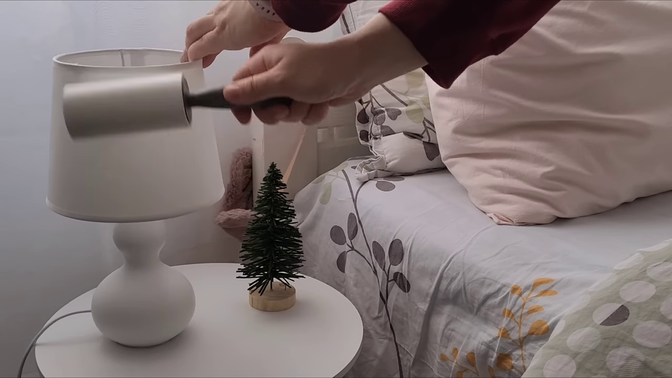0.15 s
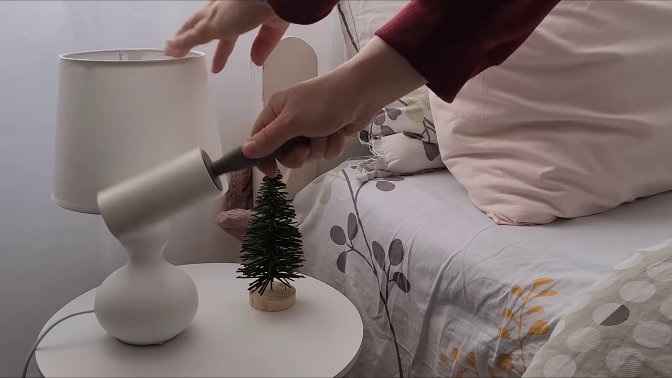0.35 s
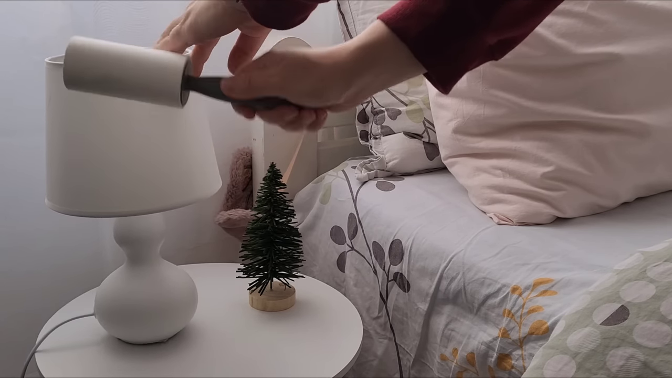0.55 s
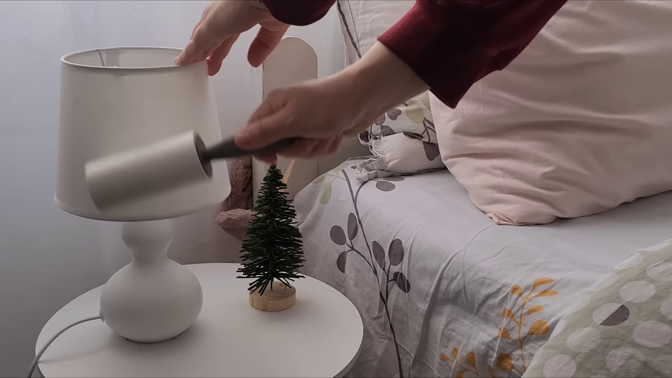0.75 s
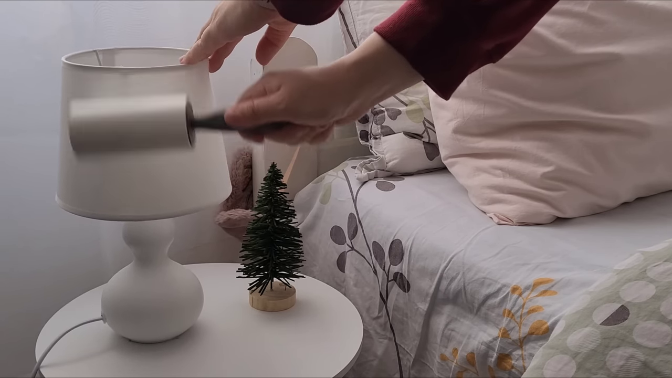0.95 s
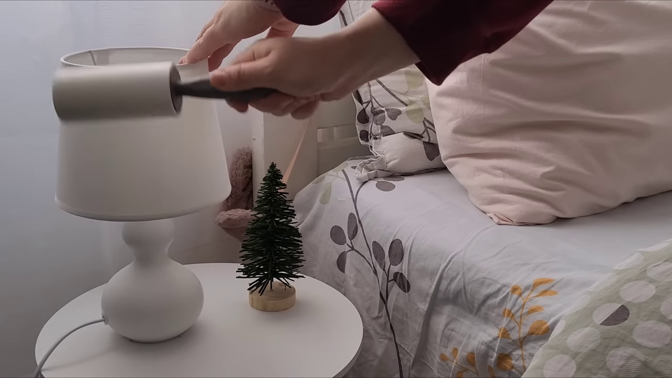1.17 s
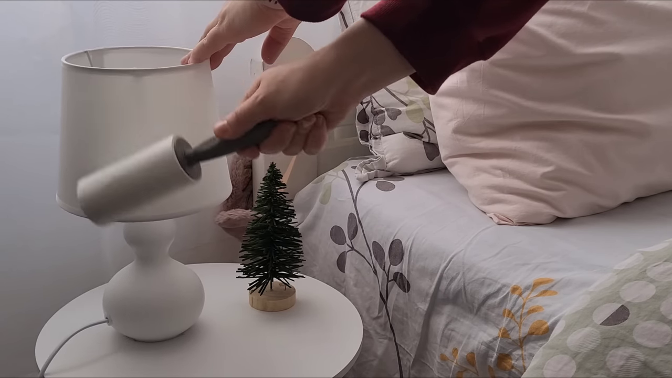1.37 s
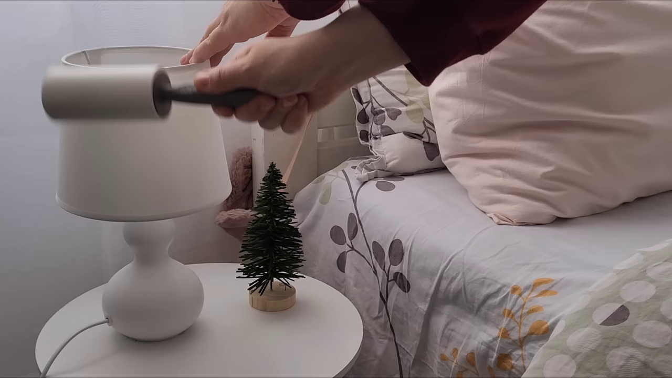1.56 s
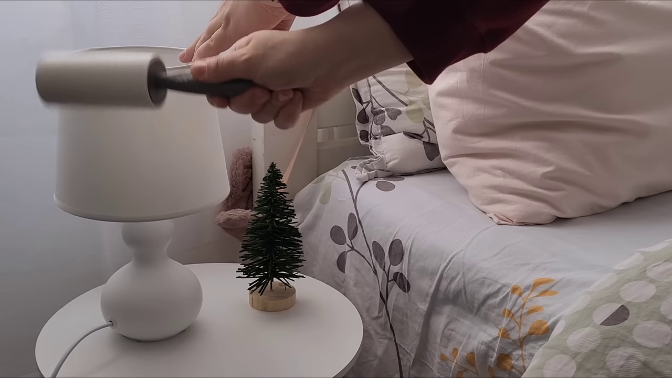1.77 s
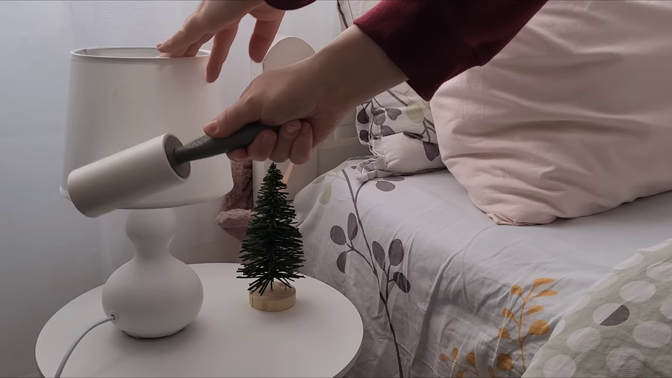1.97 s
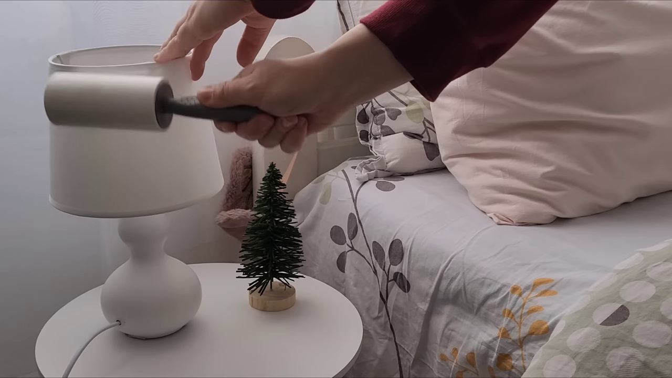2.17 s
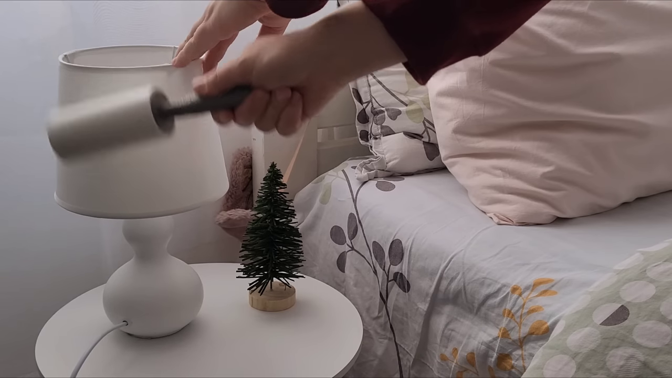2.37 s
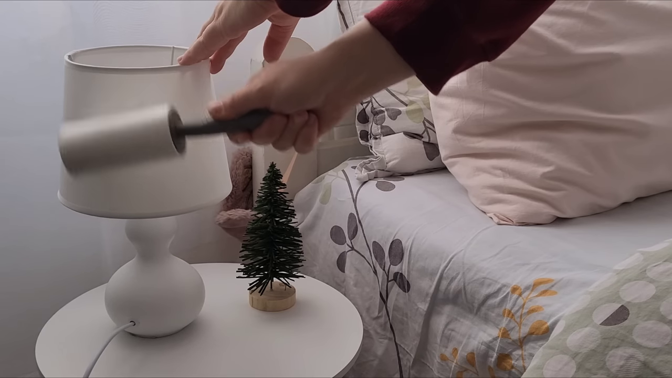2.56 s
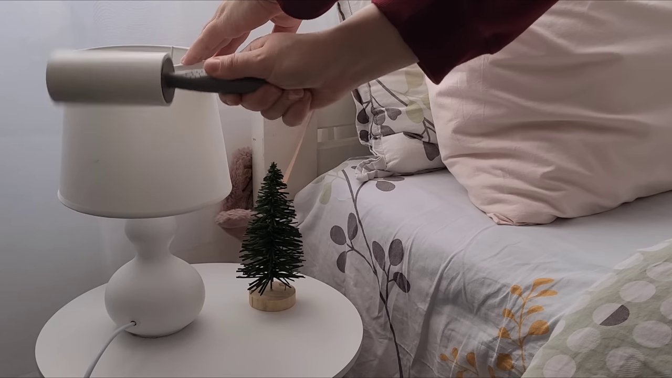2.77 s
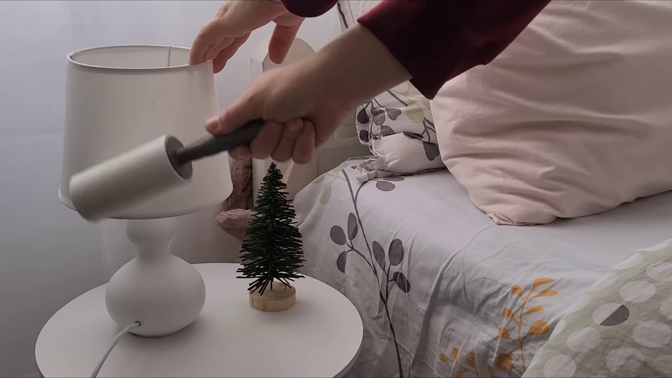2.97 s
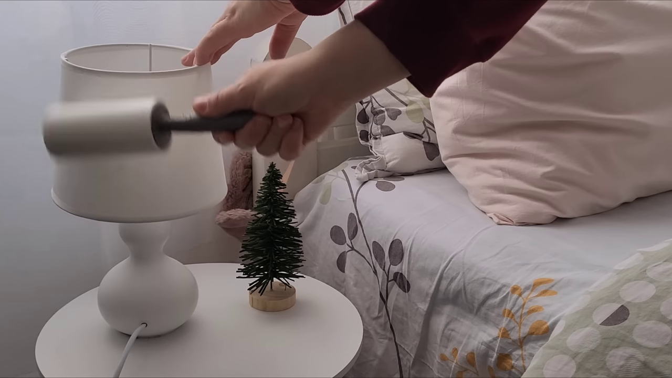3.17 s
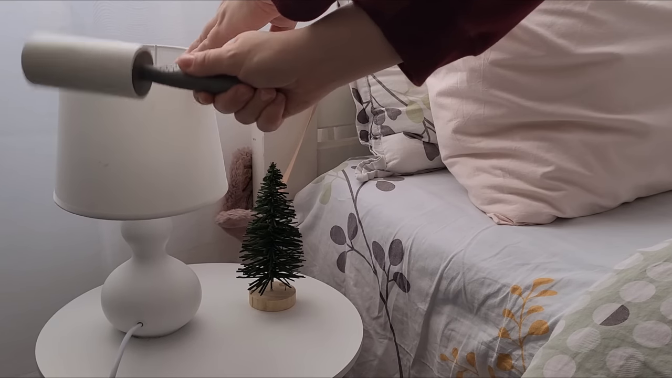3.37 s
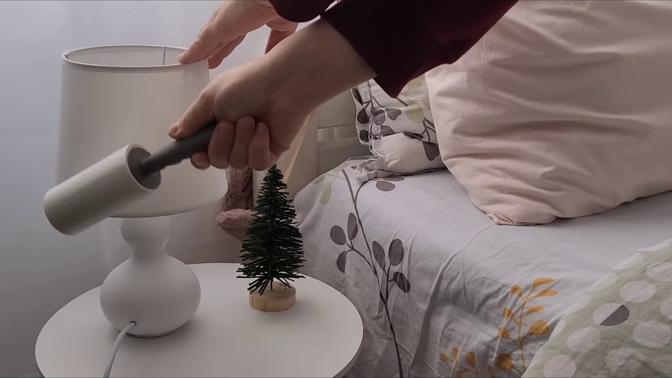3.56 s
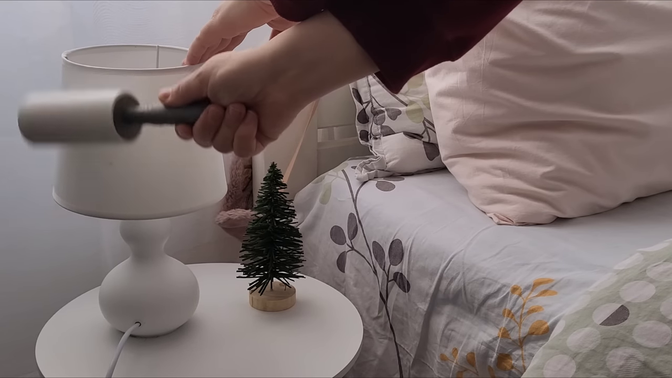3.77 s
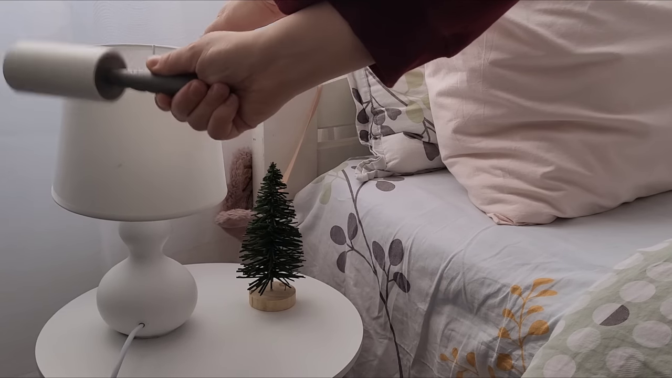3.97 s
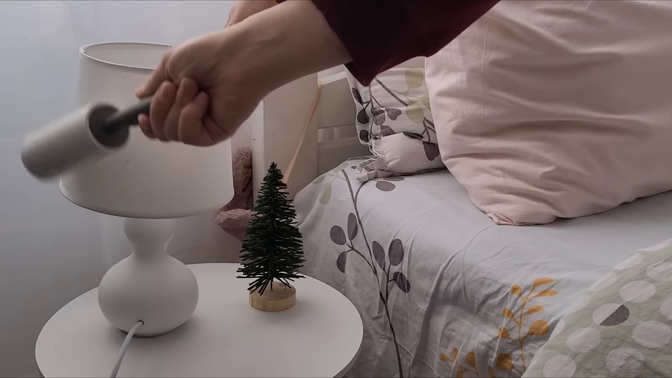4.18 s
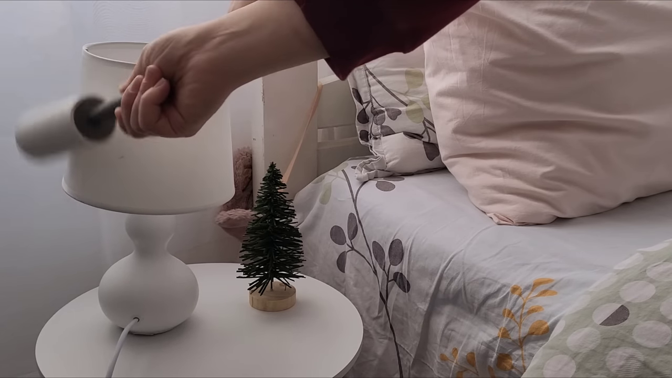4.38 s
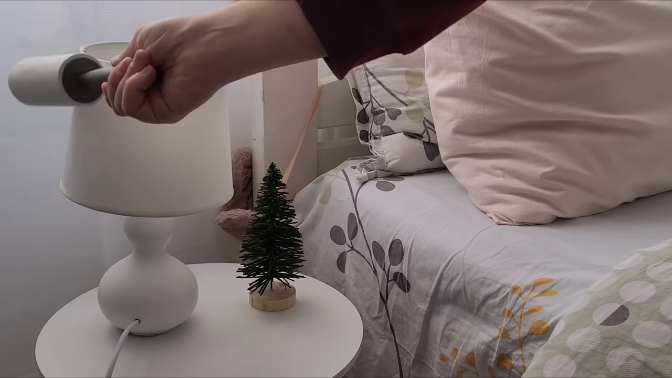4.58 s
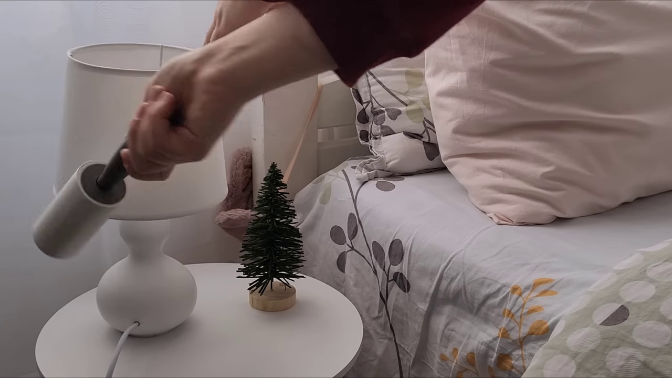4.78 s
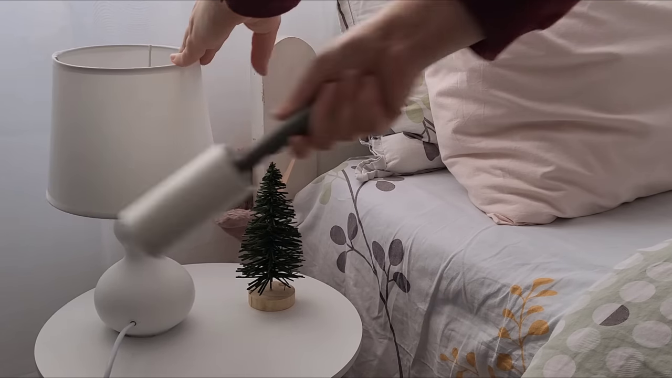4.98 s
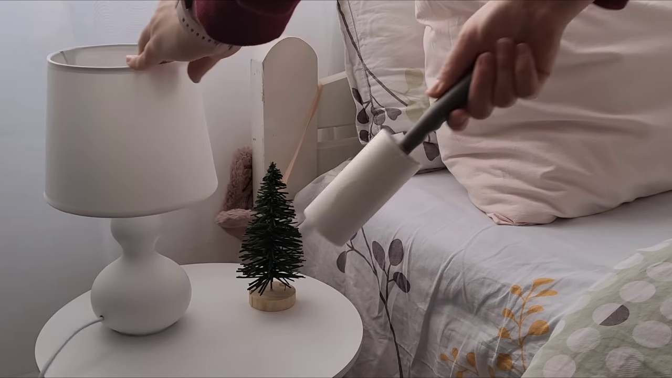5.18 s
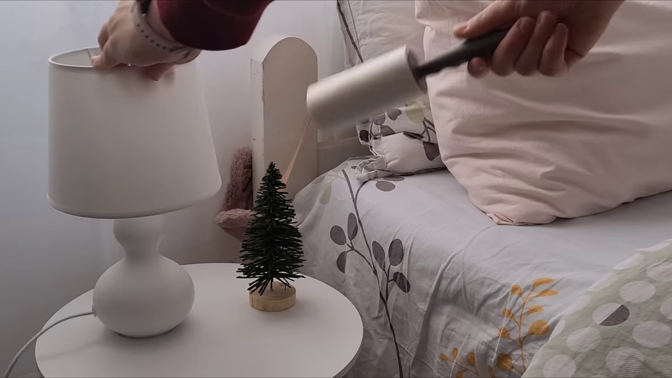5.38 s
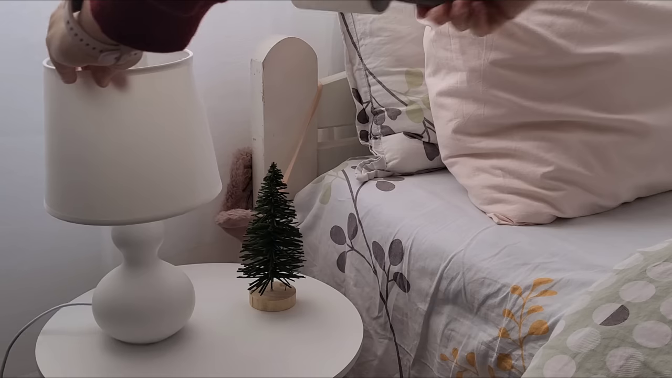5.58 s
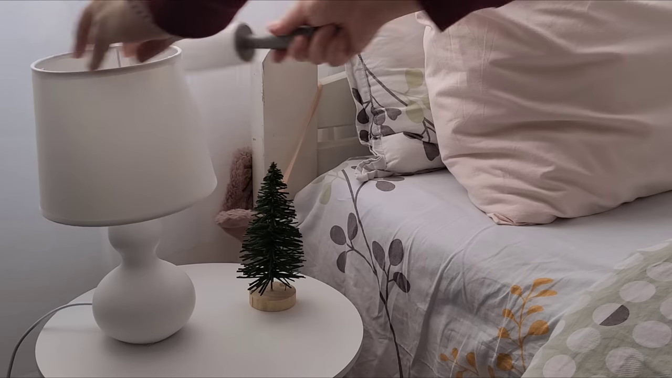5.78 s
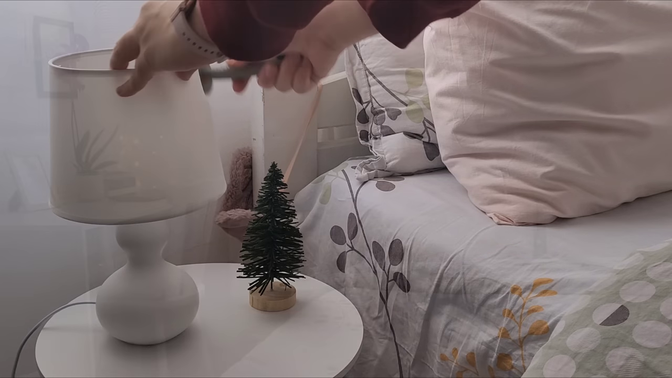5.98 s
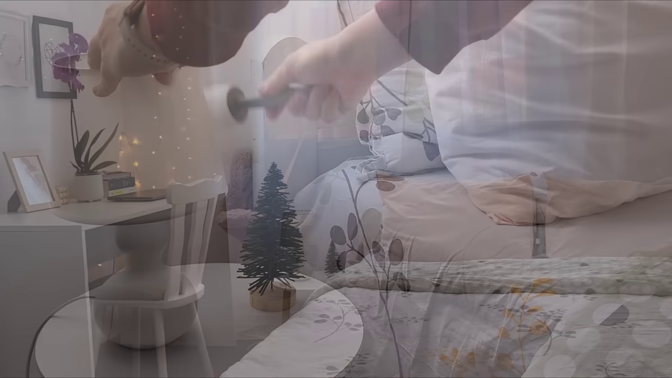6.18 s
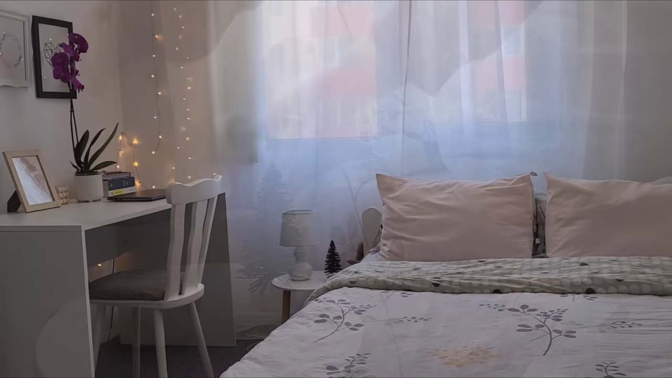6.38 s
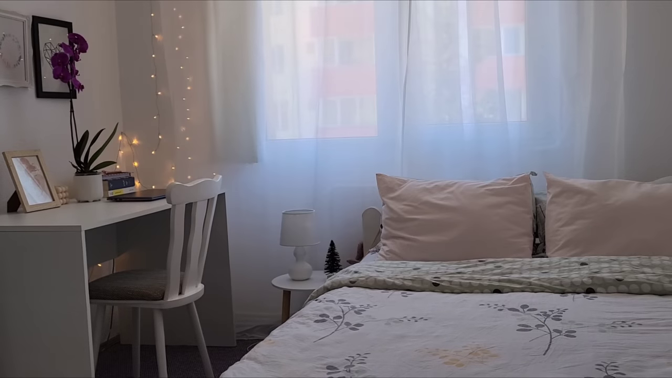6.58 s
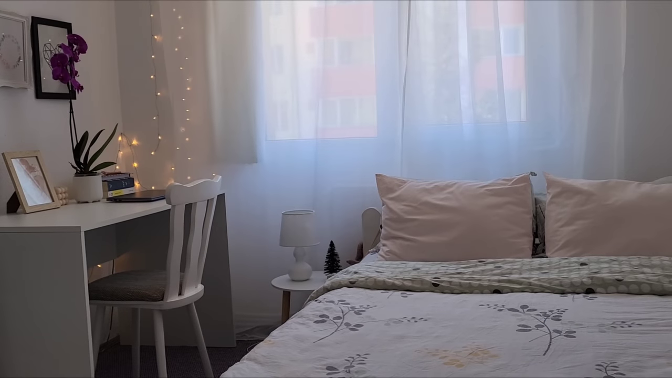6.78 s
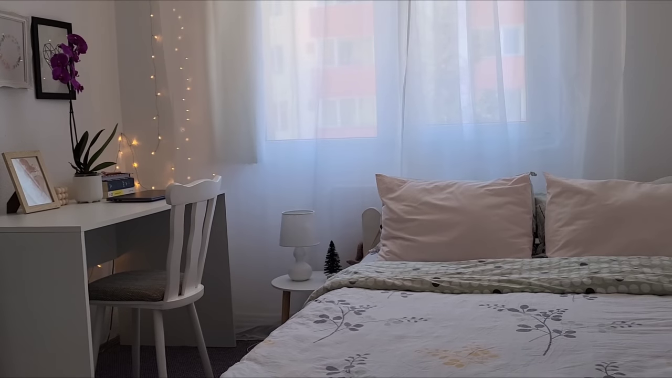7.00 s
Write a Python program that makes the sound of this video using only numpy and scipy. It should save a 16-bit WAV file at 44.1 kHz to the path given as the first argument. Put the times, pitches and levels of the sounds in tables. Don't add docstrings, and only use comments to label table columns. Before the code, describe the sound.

Close up in a soft, quiet bedroom, a sticky lint roller runs rapidly up and down a fabric lampshade. Each brief stroke crackles and fizzes as glue lets go, while the hollow roll rings and the taut shade drums. Knocks, sharp ticks and faint axle squeaks interrupt. Then fingers slide softly, the lamp foot bumps the table, last rolls crackle, and quiet remains. Stereo, leaning left.

```python
import sys
import numpy as np
from scipy import signal
from scipy.fft import rfft, irfft, next_fast_len
from scipy.io import wavfile
from scipy.ndimage import uniform_filter1d

SR = 44100
rng = np.random.default_rng(int(sys.argv[2]) if len(sys.argv) > 2 else 0)


def unload_wav(signal):
    wavfile.write(
        sys.argv[1],
        SR,
        np.round(np.clip(np.atleast_2d(signal).T, -1, 1) * 32767).astype(np.int16),
    )


def amplitude_ratio(level_db):
    exponent = np.asarray(level_db, float) / 20
    return 10 ** exponent


N = 310464
T = np.arange(N) / SR
CONTROL_STEP = 32

# f/Hz, density/dB
HUSH_SPECTRUM = [(15, -34), (25, 7), (65, -6.5), (399, -31), (1390, -28.5), (3410, -29.5), (10100, -37.5),
                 (13600, -35), (15200, -33), (16500, -54.5)]
HUSH_DB, FADE_FROM_S, FADE_TO_S, FADE_DB = -71, 5.7, 6.6, -7
ROOM_T60_S, ROOM_DB = 0.14, -8.5
# f/Hz, left minus right/dB
PORT_BALANCE = [(60, 5.5), (110, 4.5), (200, 3.0), (380, 2.0), (700, 3.0), (1290, 4.0), (2380, 3.0),
                (4400, 1.5), (8120, 0.5), (15000, 0.5)]
PORT_LEAD_S = 0.00016
MIC_LOW_HZ, TREBLE_END_HZ = 50, 15900

# f/Hz, density/dB
SHEET_SPECTRUM = [(2120, -37), (3600, -6.5), (4110, -9), (5350, -3.5), (6260, -7), (7650, -2.5),
                  (9200, -15.5), (12000, -22), (20200, -120)]
# f/Hz, density/dB
FIZZ_SPECTRUM = [(5290, -29), (9000, -7), (11900, -3.5), (15100, -3), (15900, -7)]
# f/Hz, density/dB
ROLL_SPECTRUM = [(940, -23), (1600, -10.5), (1990, -6), (2520, 1.5), (2730, -3), (4000, -14.5),
                 (5200, -33.5), (8800, -120)]
# f/Hz, density/dB
PANEL_SPECTRUM = [(210, -32.5), (360, -8), (511, -7), (642, -1), (706, -4.5), (808, 4.5), (960, -3),
                  (1370, 0.5), (1900, -14), (2600, -29), (4400, -120)]
# f/Hz, density/dB
HOOP_SPECTRUM = [(21, -31.5), (35, 0), (80, 9.5), (187, -2), (311, -4), (345, -20.5), (420, -7),
                 (550, -37.5), (920, -120)]
# f/Hz, density/dB
SKIN_SPECTRUM = [(2120, -41), (3600, -15.5), (4530, -12), (5560, -3), (6340, -11), (7680, -6),
                 (10600, -14.5), (13900, -15), (15900, -9)]
# f/Hz, density/dB
THUD_SPECTRUM = [(80, -15), (170, -9), (450, -19.5), (900, -2), (1700, -9), (3200, -10), (6000, -47)]
# f/Hz, width/Hz, level/dB
ROLL_RINGS = [(2530, 97, 5), (4370, 390, -2.5), (5060, 130, -11), (7300, 540, -13)]
# f/Hz, level/dB, t60/s
PANEL_MODES = [(386, -20.5, 0.03), (642, 0, 0.088), (811, 2, 0.078), (976, -7, 0.06), (1216, -9, .05),
               (1400, 3, 0.045), (1700, -7, 0.053)]
# f/Hz, level/dB, t60/s
HOOP_MODES = [(85, -33, 0.16), (133, -7.5, 0.97), (189, 14, 0.11), (245, 12.5, 0.16), (294, 21.5, 0.073)]
# f/Hz, level/dB, t60/s
TABLE_MODES = [(124, 2, 0.25), (243.5, 4, 0.12), (336, -12, 0.046)]
# f/Hz, width/Hz
PANEL_ZONES = [(430, 260), (800, 380), (1400, 460)]
# multiple of pitch, level/dB
SQUEAK_PARTIALS = [(1, 3.5), (1.84, -3.5), (2.3, -14.5)]

# t/s, length/ms, crackle at start/dB, at end/dB, panel re crackle/dB
SKIMS = [(0.117, 77, -46.5, -56, -8), (0.271, 36, -64.5, -42.5, -2), (0.375, 47, -39.5, -59, -1.0),
         (0.462, 52.6, -52, -43.0, -16), (0.627, 88, -51, -54.5, -0.5), (0.766, 74, -46, -41.5, -14),
         (0.955, 69, -51, -48.5, -2.0), (1.102, 83, -43.5, -49.5, -9.5), (1.276, 76, -53.5, -55.5, 0),
         (1.395, 81, -50, -45, -20.5), (1.727, 14, -42.5, -55, -15), (2.038, 53, -49.5, -49.5, -8),
         (2.194, 91, -55.5, -54.5, -2.5), (2.335, 81, -50.0, -43.5, -21), (2.698, 99, -48.5, -60, -4),
         (3.0, 48, -49, -43, -15.5), (3.289, 17, -42, -56, -33), (3.622, 31, -47.5, -40, -12.5),
         (3.905, 69, -45, -47.5, -6.5), (4.197, 68, -60, -49.0, -0.5), (4.493, 64, -71.5, -48, 3.5)]
# t/s, length/ms, crackle at start/dB, at end/dB, panel re crackle/dB
PRESSES = [(-0.024, 76, -47, -59, -3), (1.577, 75, -53, -52.5, -1), (1.79, 7.1, -87, -61, 24),
           (1.851, 75, -57, -47.5, -2), (2.541, 53, -52, -50.5, -2), (2.856, 68.5, -52.5, -52.0, -0.5),
           (3.102, 15.0, -48.5, -64, 4.5), (3.145, 78, -56, -47, -0.5), (3.375, 50, -68, -64, 6.5),
           (3.465, 62, -49.5, -51.5, 5), (3.712, 16, -47.5, -65, -9), (3.751, 89, -49, -54.5, -1),
           (4.058, 65, -52.5, -52.5, 2.5), (4.376, 62, -49, -52.5, 1.5), (4.652, 73, -62.0, -49, 5)]
# t/s, length/ms, crackle at start/dB, at end/dB, panel re crackle/dB
JOLTS = [
    (5.916, 95, -48.5, -61.5, -1.5),
    (6.014, 128.5, -50.5, -64, 6.5),
    (6.268, 22, -63.5, -66, 1),
    (6.334, 91, -61.5, -59, 3.5),
    (6.464, 26.7, -59.5, -75, 1),
]
# t/s, length/ms, rub at start/dB, at end/dB, panel re rub/dB
FINGERS = [
    (5.014, 106, -67.5, -54.5, -13.5),
    (5.172, 53.4, -65.5, -78, -3),
    (5.24, 24.0, -63.5, -65, -32),
    (5.321, 29.0, -68, -65.5, -21),
    (5.391, 109.0, -73, -87, -26),
    (5.51, 31.0, -73, -65.5, -17),
    (5.583, 55.3, -71, -67, -31),
    (5.684, 22.0, -74.5, -66, 9.5),
]
# rise/(dB/s), fall/(dB/s), share of level drift reaching the panel, late panel swell/dB
SKIM_MOTION = (800, 368, 0.66, 0.42)
PRESS_MOTION = (880, 306, 0.81, 5)
JOLT_MOTION = (2700, 370, 1.2, 2.5)
SLIDE_MOTION = (860, 540, 1.4, 1.1)
SWELL_AT, SWELL_WIDTH = 0.79, 0.4
PANEL_LINGERS = 0.68

# t/s, level/dB, decay/(dB/s)
ROCKS = [(-0.02, -62, 30), (0.085, -51.5, 88), (0.288, -59.5, 26), (0.538, -52.5, 82), (0.707, -49, 183),
         (0.878, -64, 38), (1.019, -50, 69), (1.323, -56.5, 95), (1.509, -62.5, 22.5), (1.643, -53, 295),
         (1.802, -41.5, 110), (2.044, -64.5, 33), (2.444, -51.5, 100.0), (2.696, -66.5, 21),
         (2.808, -52.5, 64), (3.006, -55.5, 33), (3.25, -51.5, 220), (3.404, -40.5, 105),
         (3.622, -56.5, 18), (3.864, -54.0, 54), (4.05, -54.5, 32), (4.297, -50, 40.5),
         (4.541, -61.0, 40.0), (4.744, -50, 174)]
# t/s, level/dB, decay/(dB/s)
NUDGES = [
    (5.138, -50.5, 290.0),
    (5.308, -57.5, 150.0),
    (5.545, -69.5, 60.0),
    (5.709, -78, 59.5),
    (5.925, -41, 138),
    (6.171, -60.5, 400.0),
    (6.28, -53.5, 110.3),
    (6.659, -58, 627),
    (6.835, -75.5, 50.0),
]
ROCK_RISE_DB_S = 801.5

# t/s, panel/dB, hoops re panel/dB, crack re panel/dB, tuning ratio
KNOCKS = [(0.301, -26, -23.5, -6, 1.3), (0.305, -43.5, -29.5, 5, 1.5), (0.371, -42, -22, 7, 1.6),
          (0.381, -44, -25, 9, 1.3), (1.793, -20, -11, -36, 0.92), (3.355, -50.5, -6, 0, 0.72),
          (3.395, -22.5, -1.5, -31, 0.88), (3.699, -30.5, -22, -12, 0.9), (3.747, -24.5, -35, -2.5, 0.93),
          (4.743, -29.5, -5, -23, 0.72), (5.702, -51, -4, -14, 1.01), (6.012, -32, -36, -5, 0.79),
          (6.461, -42.5, -27, -20, 1.1)]
# t/s, panel/dB, table re panel/dB, crack re panel/dB, tuning ratio
BUMPS = [
    (5.915, -31, 1.5, 6.5, 0.63),
    (6.267, -43.5, -6.5, -12, 0.58),
    (6.641, -47.5, -9, -23, 0.453),
    (6.883, -62.5, -9, -32.5, 0.31),
]
KNOCK_CONTACT_MS, BUMP_CONTACT_MS = 9.5, 13
# t/s, level/dB
SNAPS = [(0.2314, -29), (0.2634, -38.5), (0.273, -22), (0.3075, -24), (0.3718, -15.5), (0.3765, -32),
         (0.382, -34), (0.5783, -29), (1.195, -39), (3.3758, -24.5), (3.494, -26), (4.87, -54.5),
         (5.011, -36)]
# t/s, level/dB
GRABS = [(0.1078, -33.5), (0.4576, -23), (0.95, -28), (1.2753, -30), (2.1951, -31), (2.5267, -41),
         (2.993, -32.5), (3.096, -34), (3.897, -26), (4.365, -38), (4.541, -30.5)]
# t/s, level/dB, length/ms, f/Hz
SQUEAKS = [
    (0.108, -35, 10, 2480),
    (2.3934, -33, 13, 2490),
    (2.418, -36, 13, 2530),
    (2.4288, -36, 5.1, 2520),
    (3.2844, -28, 8.7, 2500),
    (3.96, -37, 12, 2200),
]
SQUEAK_WIDTH_HZ = 86
# from t/s, to t/s, f/Hz, level/dB
CREAKS = [
    (4.906, 5.011, 1480, -66),
    (5.441, 5.507, 1260, -70),
]

PANEL_DB, FIZZ_DB, ROLL_DB, HAND_ROLL_DB, HOOPS_DB = -1, -0.5, 1.5, -5, -2.5
ROLL_FROM_PANEL = 0.27
FIZZ_STEEPER, FIZZ_PIVOT_DB = 0.054, -43
ZONE_SWING_DB, ZONE_PER_S = 4, 11
REST_PANEL_DB, REST_ROLL_DB, REST_RUB_DB, REST_ENDS_S = -80.5, -70.5, -79.5, 5.75


def unit(x):
    return x / np.sqrt(np.mean(x ** 2))


def shape(points, hz):
    f, db = np.transpose(points)
    return np.interp(np.log(hz + 1), np.log(f + 1), db)


def colour(x, points):
    gain_db = shape(points, np.linspace(0, SR / 2, 2049))
    cepstrum = irfft(np.log(amplitude_ratio(gain_db)))
    cepstrum[1:2048] *= 2
    cepstrum[2049:] = 0
    response = irfft(np.exp(rfft(cepstrum)))
    response = response / np.sqrt(np.sum(response ** 2))
    y = signal.oaconvolve(np.atleast_2d(x), response[None], axes=1)
    return y[:, :x.shape[-1]].reshape(x.shape)


def band(x, hz, width_hz):
    return signal.lfilter(*signal.iirpeak(hz, hz / width_hz, fs=SR), x)


def crisp(x):
    return colour(x, SHEET_SPECTRUM) + 0.66 * colour(x, FIZZ_SPECTRUM)


def ring(modes, tuning, t):
    hz, db, t60 = np.transpose(modes)[:, :, None]
    sines = np.sin(2 * np.pi * hz * tuning * t)
    y = np.sum(amplitude_ratio(db) * sines * amplitude_ratio(-60 * t / t60), axis=0)
    return y / np.max(np.abs(y))


def walk(per_s):
    hold = int(SR / per_s)
    levels = np.repeat(rng.standard_normal(N // hold + 1), hold)
    return unit(uniform_filter1d(levels, hold)[:N])


def add(out, s, y):
    i = int(s * SR)
    out[i:i + len(y)] += y[:N - i]


def power_sum(db):
    return 10 * np.log10(np.sum(10 ** (db / 10), axis=0) + 1e-12)


def motion(table, kind):
    s, ms, start_db, end_db, panel_db = np.transpose(table)[:, :, None]
    rise_db_s, fall_db_s, share, swell_db = kind
    t = T[::CONTROL_STEP]
    along = (t - s) * 1000 / ms
    before_db = rise_db_s * np.maximum(s - t, 0)
    after_db = fall_db_s * np.maximum(t - s - ms / 1000, 0)
    drift_db = (end_db - start_db) * (np.clip(along, 0, 1) - 0.5)
    middle_db = (start_db + end_db) / 2 - before_db
    late_db = swell_db * np.exp(-((along - SWELL_AT) / SWELL_WIDTH) ** 2)
    crackle = middle_db + drift_db - after_db
    panel = middle_db + panel_db + share * drift_db + late_db - PANEL_LINGERS * after_db
    return np.array([np.interp(T, t, power_sum(db)) for db in (crackle, panel)])


def strands(per_s, spread_db, patchy_db, apart):
    when, sign = rng.random((3, N)), rng.standard_normal((3, N))
    size = rng.exponential(size=(3, N))
    strength = amplitude_ratio(spread_db * size + patchy_db * walk(90))
    both, left, right = (when < per_s / SR) * sign * strength
    return unit(np.sqrt(1 - apart) * both + np.sqrt(apart) * np.array([left, right]))


def quiet():
    common, left, right = rng.standard_normal((3, N))
    level_db = HUSH_DB + np.interp(T, [FADE_FROM_S, FADE_TO_S], [0, FADE_DB])
    hush = np.array([colour(0.6 * common + 0.99 * own, HUSH_SPECTRUM) for own in (left, right)])
    return amplitude_ratio(level_db) * hush


def bedroom(x):
    t = T[:SR // 2]
    tails = rng.standard_normal((2, len(t))) * amplitude_ratio(-60 * t / ROOM_T60_S) * (t > 0.003)
    tails = signal.sosfilt(signal.butter(2, 500, "high", fs=SR, output="sos"), tails)
    tails = tails / np.sqrt(np.sum(tails[0] ** 2))
    return amplitude_ratio(ROOM_DB) * signal.fftconvolve(x[None], tails, axes=1)[:, :N]


def ports(x):
    size = next_fast_len(N + SR)
    hz = np.fft.rfftfreq(size, 1 / SR)
    half = amplitude_ratio(shape(PORT_BALANCE, hz) / 2) * np.exp(1j * np.pi * hz * PORT_LEAD_S)
    return irfft(rfft(x, size) * np.array([half, 1 / half]), size)[:, :N]


def fingers(hand):
    rub = strands(per_s=11000, spread_db=-2.0, patchy_db=0.5, apart=0.47)
    gain = amplitude_ratio(hand[0] + 4.5) + amplitude_ratio(REST_RUB_DB) * (T < REST_ENDS_S)
    out = colour(rub * gain, SKIN_SPECTRUM)
    for start, end, hz, db in CREAKS:
        on = uniform_filter1d(1.0 * ((T > start) & (T < end)), size=600)
        out += amplitude_ratio(db) * unit(band(rng.standard_normal(N), hz, 84)) * on
    return out


def axle():
    out, t = np.zeros(N), T[:SR // 10]
    for s, db, ms, hz in SQUEAKS:
        along = t * 1000 / ms
        chatter = rng.standard_normal(len(t)) * along ** 0.3 * np.exp(-along ** 3)
        for multiple, part_db in SQUEAK_PARTIALS:
            add(out, s, amplitude_ratio(db + part_db) * band(chatter, hz * multiple, SQUEAK_WIDTH_HZ))
    return 7 * out


def knocks(table, low_modes, contact_ms):
    out, t = np.zeros(N), T[:SR // 3]
    for s, db, low_db, crack_db, tuning in table:
        rattle, hiss = rng.standard_normal((2, len(t)))
        push = rattle * np.exp(-t * 1000 / contact_ms)
        panel = signal.fftconvolve(push, ring(PANEL_MODES, tuning, t))[:len(t)]
        thud = colour(push, np.multiply(THUD_SPECTRUM, [tuning, 1]))
        low = ring(low_modes, 0.94, t) * (1 - np.exp(-t / 0.0045))
        crack = crisp(hiss * (0.45 * np.exp(-t / 0.0008) + 0.16 * np.exp(-t / 0.007)))
        body = 0.22 * panel / np.max(np.abs(panel)) + 0.44 * thud / np.max(np.abs(thud))
        add(out, s, 1.405 * amplitude_ratio(db) * (body + amplitude_ratio(low_db) * low + amplitude_ratio(crack_db) * crack))
    return out


def snaps():
    out, t = np.zeros(N), T[:SR // 10]
    tick = 0.26 * (np.exp(-t / 0.00054) + 0.12 * np.exp(-t / 0.018))
    grab = 0.18 * np.exp(-t / 0.0074)
    for table, envelope in ((SNAPS, tick), (GRABS, grab)):
        for s, db in table:
            add(out, s, amplitude_ratio(db) * rng.standard_normal(len(t)) * envelope)
    return crisp(out) + 0.53 * colour(out, ROLL_SPECTRUM)


def rocking():
    s, db, decay_db_s = np.transpose(ROCKS + NUDGES)[:, :, None]
    t = T[::CONTROL_STEP]
    rise_db = ROCK_RISE_DB_S * np.maximum(s - t, 0)
    decay_db = decay_db_s * np.maximum(t - s, 0)
    return amplitude_ratio(HOOPS_DB + np.interp(T, t, power_sum(db - rise_db - decay_db)))


def hollow(crackle_db, panel_db):
    return crackle_db + ROLL_FROM_PANEL * (panel_db - crackle_db)


def peeling(hand):
    strokes = [motion(SKIMS, SKIM_MOTION), motion(PRESSES, PRESS_MOTION), motion(JOLTS, JOLT_MOTION)]
    crackle, press = power_sum(np.array(strokes))
    held = uniform_filter1d(1.0 * (T < REST_ENDS_S), size=3000)
    fine = strands(per_s=9000, spread_db=1.17, patchy_db=1.61, apart=0.82)
    coarse = strands(per_s=3600, spread_db=2, patchy_db=2.0, apart=0.26)

    fizz = crackle + FIZZ_DB + FIZZ_STEEPER * (crackle - FIZZ_PIVOT_DB)
    sheet = colour(fine * amplitude_ratio(crackle), SHEET_SPECTRUM) + colour(fine * amplitude_ratio(fizz), FIZZ_SPECTRUM)

    roll_gain = amplitude_ratio(hollow(crackle, press) + ROLL_DB) + amplitude_ratio(hollow(*hand) + HAND_ROLL_DB)
    roll = unit(fine + 0.55 * coarse) * (roll_gain + held * amplitude_ratio(REST_ROLL_DB))
    rings = sum(amplitude_ratio(db + 2.4 * walk(24)) * band(roll, hz, width) for hz, width, db in ROLL_RINGS)

    panel = coarse * (amplitude_ratio(press + PANEL_DB) + amplitude_ratio(hand[1]) + held * amplitude_ratio(REST_PANEL_DB))
    drum = sum(amplitude_ratio(db + 5 * walk(9.4)) * band(panel, hz, 2.2 / t60) for hz, db, t60 in PANEL_MODES)
    body = colour(panel, PANEL_SPECTRUM)
    zones = sum((amplitude_ratio(ZONE_SWING_DB * walk(ZONE_PER_S)) - 1) * band(body, hz, width)
                for hz, width in PANEL_ZONES)

    hoops = strands(per_s=900, spread_db=2, patchy_db=2, apart=0.11) * rocking()
    return (sheet + colour(roll, ROLL_SPECTRUM) + 1.2 * rings + body + zones + 1.3 * drum
            + colour(hoops, HOOP_SPECTRUM))


def hand_echo(x):
    wander_s = 0.00018 * np.array([walk(7), walk(7)])
    lags = SR * np.clip(0.00051 + wander_s, 0, 1)
    n = np.arange(N)
    return x + 0.29 * np.array([np.interp(n - lag, n, channel) for channel, lag in zip(x, lags)])


def scene():
    hand = motion(FINGERS, SLIDE_MOTION)
    hits = knocks(KNOCKS, HOOP_MODES, KNOCK_CONTACT_MS) + knocks(BUMPS, TABLE_MODES, BUMP_CONTACT_MS)
    hits = hits + snaps() + axle()
    shade = 1.121 * hand_echo(fingers(hand) + peeling(hand)) + hits
    return quiet() + bedroom(shade.mean(axis=0)) + ports(shade)


def low_pass(x):
    return signal.sosfilt(signal.butter(12, 16960, fs=SR, output="sos"), x)


def record(dry):
    low = signal.butter(4, MIC_LOW_HZ, "high", fs=SR, output="sos")
    top = signal.ellip(12, 0.2, 45, TREBLE_END_HZ, fs=SR, output="sos")
    mix = signal.sosfilt(np.vstack([low, top]), dry)
    return low_pass(mix)


dry = scene()
out = record(dry)
unload_wav(out)
```